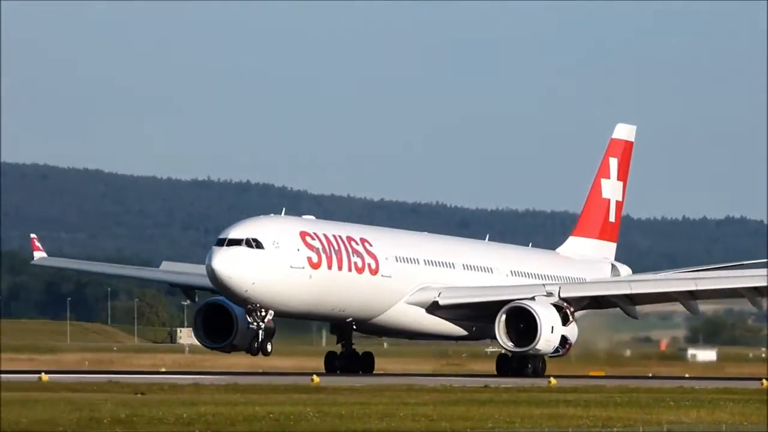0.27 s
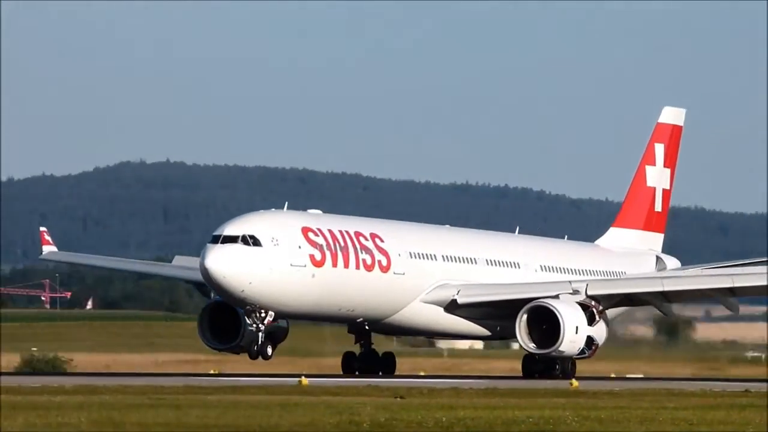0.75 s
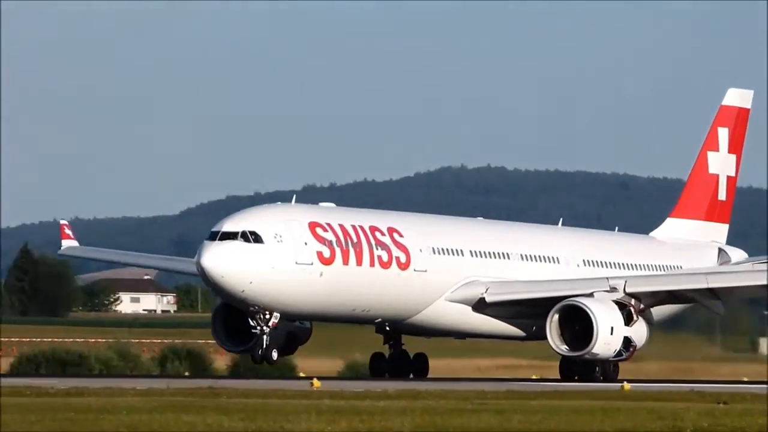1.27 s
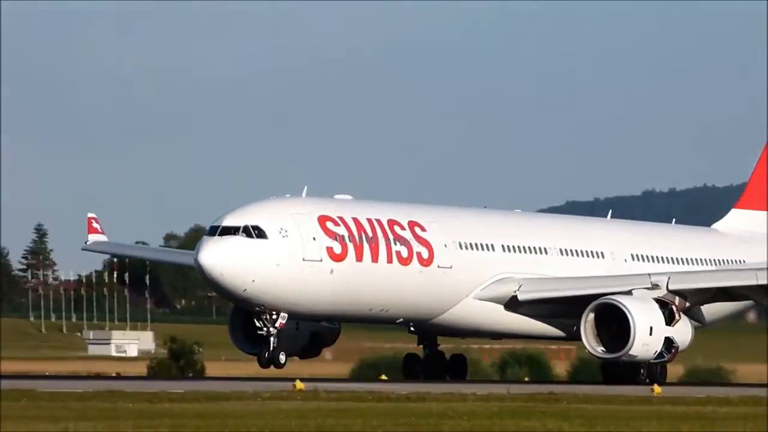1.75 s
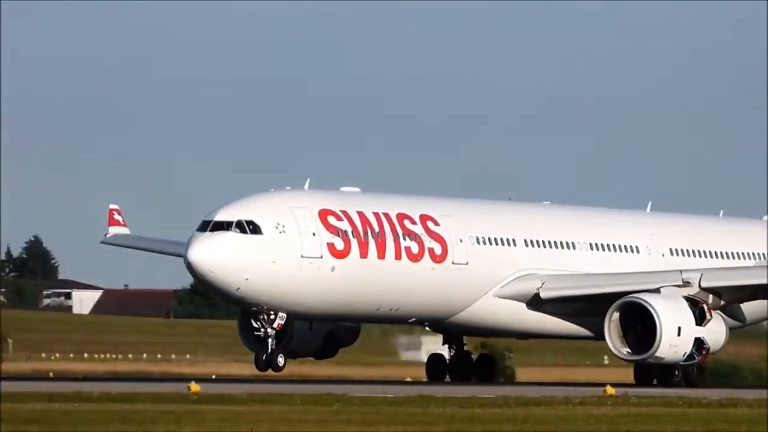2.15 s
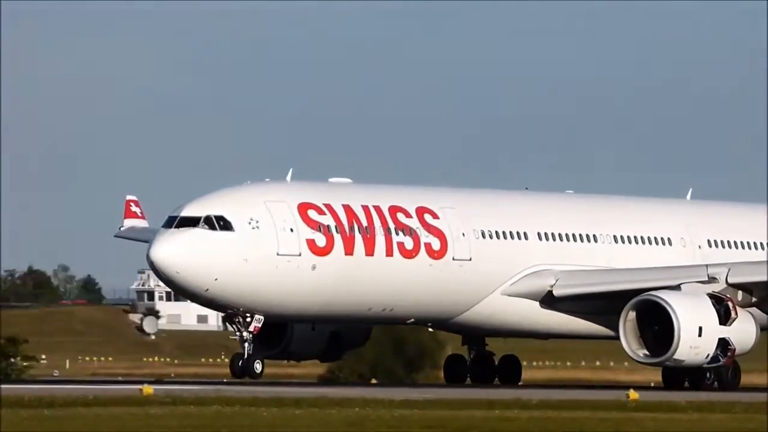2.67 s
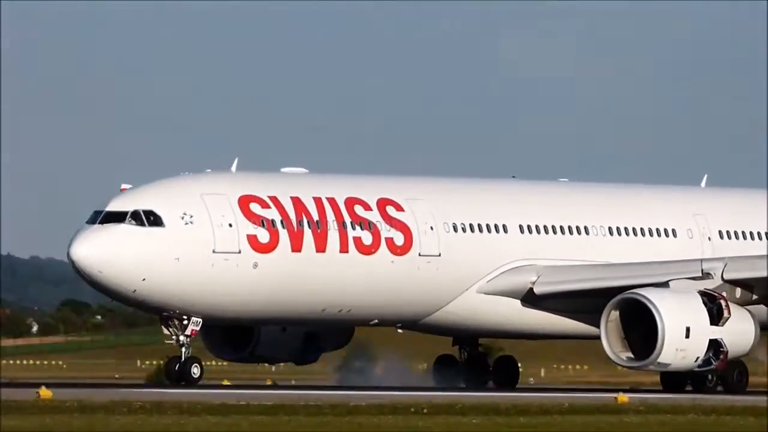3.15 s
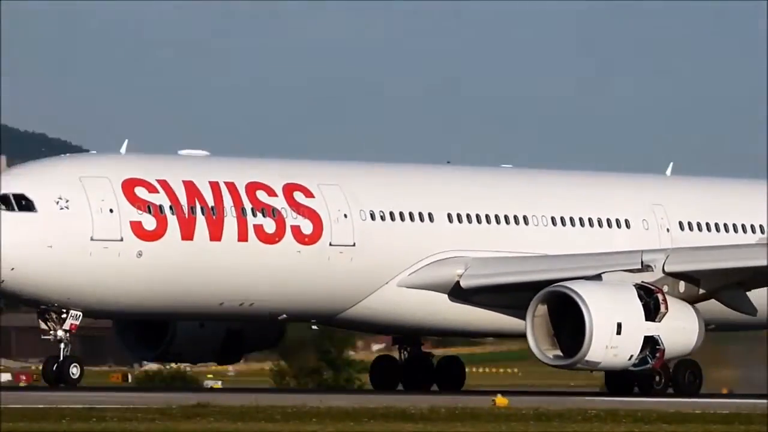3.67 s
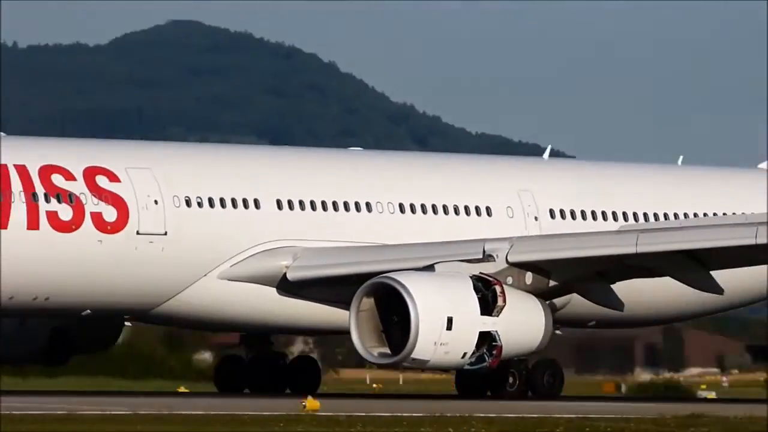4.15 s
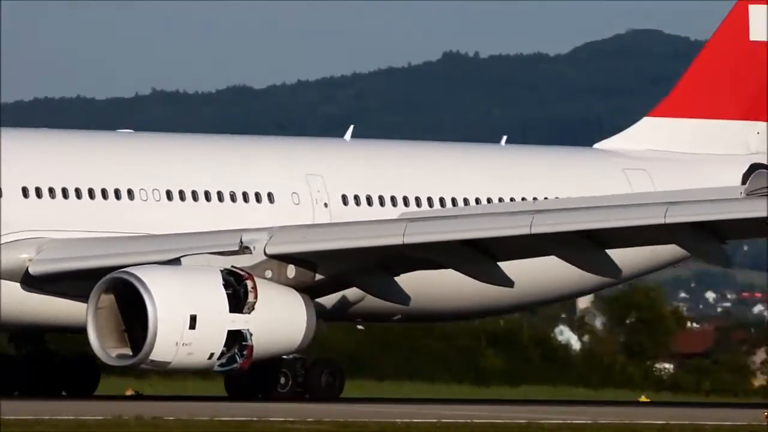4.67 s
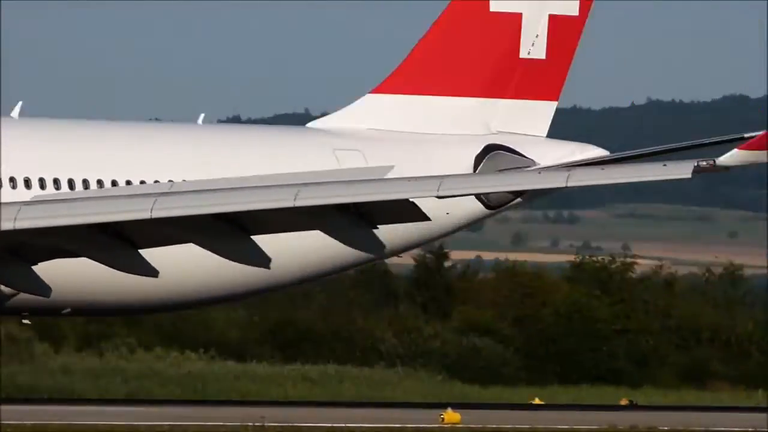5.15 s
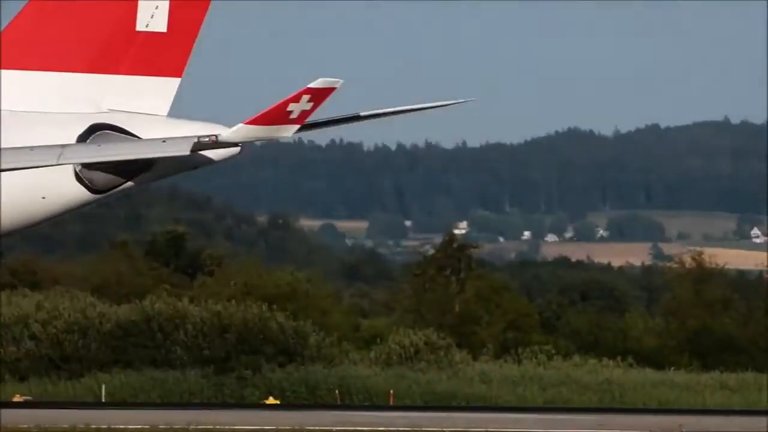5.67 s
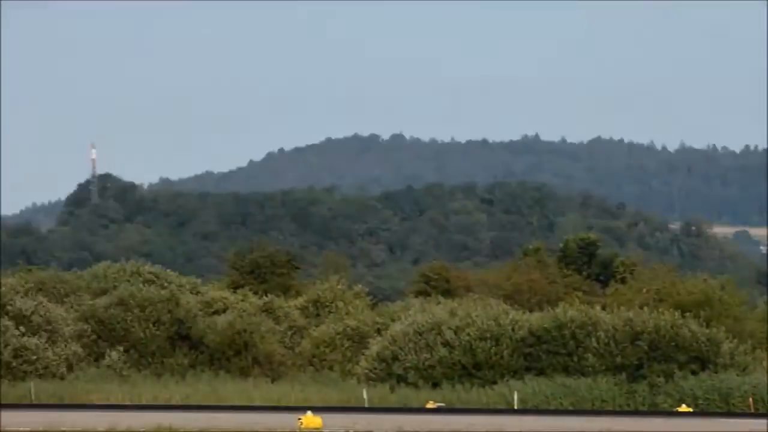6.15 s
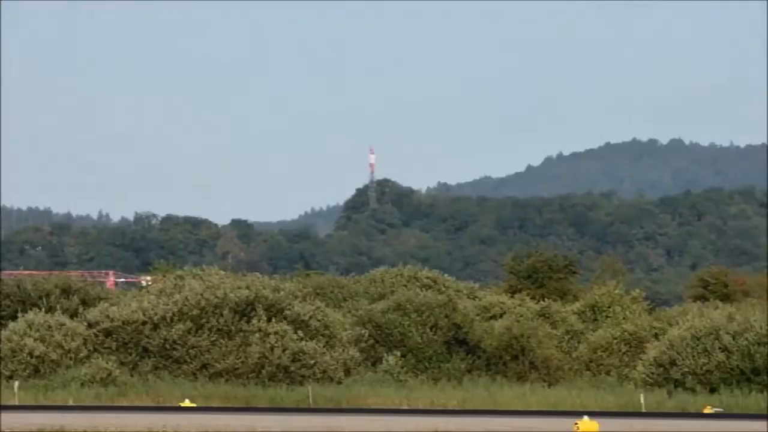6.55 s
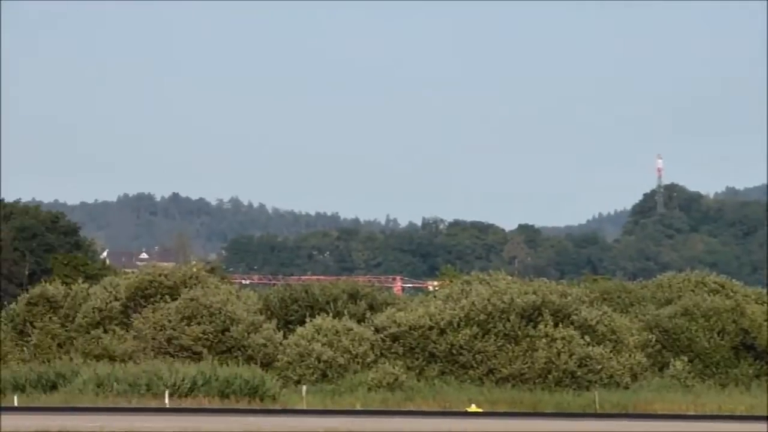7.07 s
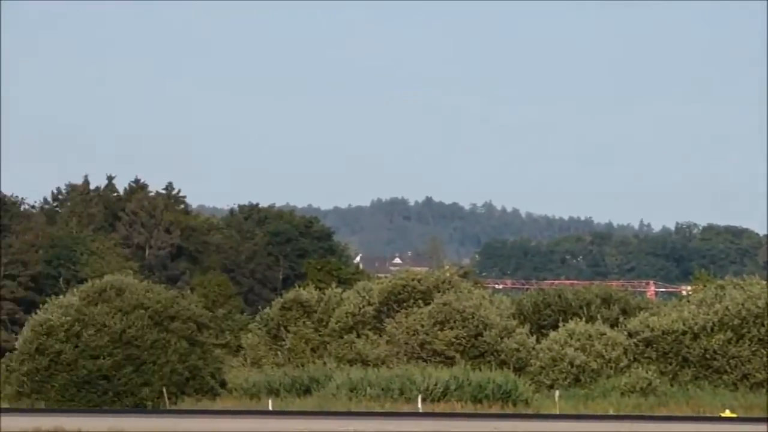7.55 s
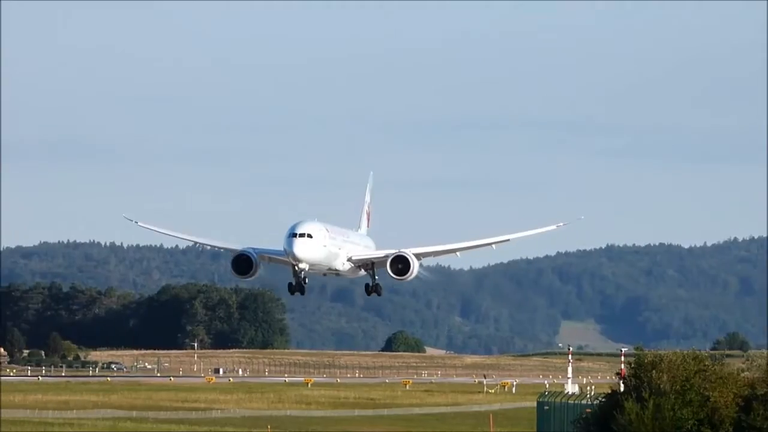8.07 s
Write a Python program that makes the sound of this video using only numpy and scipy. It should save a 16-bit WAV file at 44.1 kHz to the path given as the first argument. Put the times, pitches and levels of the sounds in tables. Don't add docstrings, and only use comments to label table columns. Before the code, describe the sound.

Loud, gusty jet roar with fleeting fan buzz and high whine brightens as the plane passes, then cuts to a softer, muffled far-off jet.

```python
import sys
import numpy as np
from scipy import signal
from scipy.fft import rfft, irfft
from scipy.io import wavfile
from scipy.ndimage import uniform_filter1d, map_coordinates

SR = 44100
rng = np.random.default_rng(int(sys.argv[2]) if len(sys.argv) > 2 else 0)


def linear_from_db(decibels):
    return 10 ** (np.asarray(decibels, float) / 20)


def generate_wav(sig):
    pcm = np.round(np.clip(np.atleast_2d(sig).T, -1, 1) * 32767).astype(np.int16)
    wavfile.write(sys.argv[1], SR, pcm)


N = 366735
SIZE, HOP = 1024, 256
HZ = np.arange(SIZE // 2 + 1)[:, None] * SR / SIZE + 1e-3
FRAME_S = np.arange(N // HOP + 2) * HOP / SR
PASSES_S = 6.4

CHANGE_S = (7.7075, 7.7745)


def colour(table, hz):
    f, db = np.transpose(table)
    return np.interp(np.log(hz), np.log(f), db)


def hump(x, centre, width, db):
    return db * np.exp(-.5 * ((x - centre) / width) ** 2)


def curves(table, s):
    t, *columns = np.transpose(table)
    return [np.interp(s, t, c) for c in columns]


def passed(s):
    passing_s = 0.93
    return .5 + .5 * np.tanh((s - PASSES_S) / passing_s)


def walk(rate, octaves):
    grid = rng.standard_normal((60, 1200))
    pitch_place = np.clip(np.log2(HZ / 20), 0, 11) / octaves
    place = np.broadcast_arrays(pitch_place, FRAME_S * rate)
    return 1.34 * map_coordinates(grid, place, order=1)


def turbulence(broad_db, patchy_db, quick_db):
    broad = broad_db * walk(rate=9, octaves=2.9)
    patchy = patchy_db * walk(rate=4.003, octaves=0.3011)
    return broad + patchy + quick_db * walk(rate=22, octaves=1.142)


def roar(db, lo_hz, hi_hz, level_db, side_db=0):
    # frequency in Hz, side minus mid in dB.
    scatter = [(25, -6), (60, -18), (110, -14.5), (190, -17), (340, -32), (610, -21.5), (1090, -19),
               (1950, -18.5), (3480, -16), (6210, -12.5), (11100, -12)]
    band = (HZ[:, 0] > lo_hz) & (HZ[:, 0] < hi_hz)
    power = np.sum(linear_from_db(db[band]) ** 2, axis=0) * 2 / SIZE
    gain = linear_from_db(db + level_db) / np.sqrt(power)
    gains = np.array([gain, gain * linear_from_db(colour(scatter, HZ) + side_db)])
    frames = signal.stft(rng.standard_normal((2, N)), nperseg=SIZE, noverlap=SIZE - HOP)[2]
    shaped = frames * gains[..., :frames.shape[-1]]
    mid, side = signal.istft(shaped, nperseg=SIZE, noverlap=SIZE - HOP)[1][:, :N]
    return np.array([mid + side, mid - side])


def gusts(drift_db):
    # time in seconds, lift in dB, spread in seconds.
    eddies = [(.24, 4, .03), (1.0, 2, .04), (1.15, 2.5, .04), (1.34, 4, .035), (2.16, 5, .07),
              (2.35, 3, .05), (2.87, 2, .05), (3.07, 2, .03), (3.36, 3, .04), (3.67, 3.5, .04),
              (4.12, 2, .04), (4.3, 3, .035), (4.59, 5.5, .06), (4.85, 2.2, .04), (5.1, 3, .05),
              (5.26, 3, .03), (5.38, 4, .03), (5.55, 2, .05), (5.69, 5.5, .03), (5.8, 8, .035),
              (5.99, 6, .022), (6.08, 3, .02), (6.21, 4.5, .05), (6.6, 2.5, .04), (6.8, 2, .05),
              (7.03, 4, .08), (7.39, 6, .05), (7.56, 5, .03)]
    lift_db = sum(hump(FRAME_S, at, spread, db) for at, db, spread in eddies)
    return lift_db - uniform_filter1d(lift_db, size=70) + drift_db


def reversers():
    # time in seconds, roar level in dB, nearness from 0 to 1.
    roll = [(0.0, -19, 0), (.25, -18.5, 0.09), (.5, -17.5, 0.17), (.73, -19, 0.29), (1.2, -17, 0.2),
            (1.65, -16.5, 0.22), (2.0, -17.5, 0.26), (2.8, -17.5, 0.37), (3.42, -20, 0.41),
            (3.7, -17.5, 0.34), (4.35, -19.5, 0.56), (4.55, -19, 0.58), (5.1, -18.5, 0.72), (5.9, -20, 0.9),
            (6.65, -21, 0.87), (6.97, -19.5, 0.91), (7.3, -21, 0.88), (7.7, -19, 0.71)]
    # frequency in Hz, density in dB per Hz.
    far_colour = [(18, -81), (30, -50), (43, -52.5), (80, -21), (131, -24), (283, -15.5), (383, -5.5),
                  (584, -9), (672, -7.5), (932, -4.5), (1260, -2.5), (2260, -5.5), (2790, -19.5),
                  (4260, -23.5), (8000, -58), (10400, -91), (17600, -120)]
    near_colour = [(18, -75.5), (30, -38.5), (297, -12), (381, -14.5), (453, -2), (626, -7.5), (764, -4),
                   (887, -0.5), (1110, -3), (1650, -4), (1970, -6), (3950, -9.5), (5890, -11),
                   (8560, -20.5), (11500, -39), (15000, -80.5), (22000, -120)]
    # centre in Hz, width in Hz, lift in dB.
    cascade = (4040, 190, 5.1)
    haze = (7900, 1000, -9)
    # centre in Hz, lift ahead in dB, lift passed in dB,
    # fraction sunk on passing, fraction by which it starts low.
    humps = [(614, 2.5, 9, 0.05, 0.2), (915, 3, 2.5, 0, 0.2), (1304, 5, 3, .09, 0.03),
             (1833, 4.5, 8, .11, .13)]
    hump_widths = (50, 82.5, 99, 80)
    # centre in Hz, width in Hz, lift in dB.
    duct = [(1250, 84, 2.5), (666, 46, -5), (950, 150, 0.5)]

    level_db, near = curves(roll, FRAME_S)
    gone = passed(FRAME_S)
    cold = np.exp(-FRAME_S / .9)
    drift = walk(rate=2.5, octaves=.5)
    gust_db = gusts(drift_db=.3 * drift[-1, ::-1])

    db = colour(far_colour, HZ) + near * (colour(near_colour, HZ) - colour(far_colour, HZ))
    db = db + gust_db * np.minimum(HZ / 5500, 1.6) ** 0.41 / (1 + (2300 / HZ) ** 3)
    db = db + np.maximum(near, 0) ** 2 * hump(HZ, *cascade)
    db = db + np.maximum(1 - 2 * near, 0) * hump(HZ, *haze)
    rumble_db = 5 * gone + walk(rate=3, octaves=1.38)
    thud_db = -6.5 * gone - 4 * cold
    db = db + rumble_db / (1 + (HZ / 350) ** 4) + thud_db / (1 + (HZ / 110) ** 4)

    swell_db = level_db - uniform_filter1d(level_db, size=300)
    for (hz, ahead_db, passed_db, sink, start), width_hz in zip(humps, hump_widths):
        own = drift[int(hz * SIZE / SR)]
        centre_hz = hz * (1 - sink * gone - start * cold + .015 * own[::-1])
        lift_db = ahead_db + (passed_db - ahead_db) * gone + swell_db + 1.32 * own
        db = db + hump(HZ, centre_hz, width_hz, lift_db)
    overshoot = hump(FRAME_S, 1.8, 0.39, 0.94)
    db = db + overshoot * sum(hump(HZ, *mode) for mode in duct)

    level_db = level_db + .08 * gust_db
    flutter_db = turbulence(broad_db=0.5, patchy_db=0.5, quick_db=0.56)
    return roar(db, 450, 3200, level_db + flutter_db, side_db=-1)


def blade_tone(hz, moments, wobble_hz, flutter_db):
    s = np.arange(N) / SR
    gain = sum(hump(s, at, spread, linear_from_db(db)) for at, db, spread in moments)
    held = np.repeat(rng.standard_normal((2, N // 900 + 1)), 900, axis=1)
    tremble = uniform_filter1d(held, size=900, axis=1)[:, :N]
    phase = 2 * np.pi * np.cumsum(hz + wobble_hz * tremble[1]) / SR
    return np.sqrt(2) * gain * linear_from_db(flutter_db * tremble[0]) * np.sin(phase)


def fan_ahead():
    # time in seconds, level in dB, spread in seconds.
    buzz = [
        (.0, -23, .07),
        (.34, -27, .07),
        (.48, -31, .07),
        (.68, -32, .06),
        (.98, -32, .1),
    ]
    s = np.arange(N) / SR
    return blade_tone(607 - 36 * np.exp(-s / .45), buzz, wobble_hz=8, flutter_db=2)


def compressor():
    # time in seconds, rate in Hz.
    spool = [(.8, 4980), (1.0, 5176), (1.22, 5350), (1.5, 5478), (1.75, 5510), (2.0, 5471), (2.4, 5350),
             (3.2, 5160), (4.1, 4900)]
    # (time in seconds, level in dB, spread in seconds).
    stages = [
        (.854, .18, [(1.5, -52, .2), (2.17, -45, .09), (2.45, -50, .15), (2.8, -57, .15)]),
        (1, 0, [(1.1, -48, .1), (1.33, -49, .05), (1.65, -51, .22), (2.2, -50, .15), (2.7, -57, .25), (3.5, -56, .15), (3.85, -59, .15)]),
        (1.15, 0, [(1.33, -60, .07), (1.7, -59, .17), (2.1, -65, .15), (3.4, -61, .15)]),
    ]
    s = np.arange(N) / SR
    tones = 0
    for multiple, lead_s, moments in stages:
        rate_hz = multiple * curves(spool, s + lead_s)[0]
        tones = tones + blade_tone(rate_hz, moments, wobble_hz=24, flutter_db=5)
    return linear_from_db(-.3) * tones


def fan_passing():
    # time in seconds, level in dB, spread in seconds.
    buzz = [
        (6.53, -32, .07),
        (6.75, -36, .06),
        (6.97, -34, .07),
        (7.29, -32, .07),
        (7.52, -34, .09),
    ]
    s = np.arange(N) / SR
    return blade_tone(652 - 35 * (s - PASSES_S), buzz, wobble_hz=16, flutter_db=4)


def approach():
    # frequency in Hz, density in dB per Hz.
    distant_colour = [(24, -82), (40, -65), (116, -43), (150, -16.5), (256, -21.5), (331, -17.5), (366, -8),
                      (396, -14), (428, -8.5), (702, -14), (1020, -6), (1130, -5), (1370, -19), (2170, -19),
                      (4500, -58), (5850, -90), (9900, -120)]
    # centre in Hz, width in Hz, lift in dB.
    distant_humps = [(520, 88, 0.5), (1247, 62, 8), (2100, 130, 4)]
    # centre in Hz, width in Hz, lift in dB per second.
    opening = (2950, 350, 20)
    db = colour(distant_colour, HZ) + sum(hump(HZ, *h) for h in distant_humps)
    db = db - 30 * np.clip(np.log2(HZ / 4000), 0, 2)
    db = db + hump(HZ, *opening) * (FRAME_S - 8.15)
    flutter_db = turbulence(broad_db=.5, patchy_db=.6, quick_db=.8)
    return roar(db, 330, 1900, -27.5 + flutter_db, side_db=-1.5)


def scene():
    s = np.arange(N) / SR
    pan_db = -.15 + 2.65 * passed(s)
    jet = reversers() + fan_ahead() + compressor() + fan_passing()
    jet = jet * linear_from_db(np.array([pan_db, -pan_db]) / 2)
    return np.where(s < np.mean(CHANGE_S), jet, approach())


def casing(x):
    # centre in Hz, width in Hz, lift in dB.
    resonances = [(98.5, 17, 4.5), (271.6, 21.5, 4), (381.6, 20, -10), (4250, 150, -1.5), (4415, 81, -5.5)]
    hz = np.arange(N // 2 + 1) * SR / N
    port_db = -.45
    x = x * linear_from_db(np.array([[port_db], [-port_db]]) / 2)
    return irfft(rfft(x) * linear_from_db(sum(hump(hz, *r) for r in resonances)), N)


def circuit_hiss():
    # frequency in Hz, density in dB per Hz.
    hiss_colour = [(3000, 0), (4500, 0), (8000, -6), (11000, -12), (14000, -18), (15200, -23), (16000, -45)]
    level_db = -66 - 5.5 * (FRAME_S < CHANGE_S[1])
    return roar(colour(hiss_colour, HZ) + 0 * FRAME_S, 4400, 15500, level_db, side_db=7)


def ragged_treble(x):
    frames = signal.stft(x, nperseg=SIZE, noverlap=SIZE - HOP)[2]
    power = np.mean(np.abs(frames) ** 2, axis=0)
    blocks = uniform_filter1d(uniform_filter1d(power, size=8, axis=0), size=4, axis=1)
    masker = blocks[(HZ[:, 0] > 5000) & (HZ[:, 0] < 7000)].mean(axis=0)
    masker = uniform_filter1d(masker, size=8)
    growth = (masker / np.median(masker)) ** .55
    mask_db = -32.5 - 8 * np.clip((HZ - 11200) / 1000, 0, 3)
    mask_db = mask_db + 4 * rng.standard_normal(power.shape)
    heard = (blocks > masker * growth * linear_from_db(2 * mask_db)) | (HZ < 7000)
    rows = np.arange(power.shape[0]) // 8 * 8 + 4
    columns = np.arange(power.shape[1]) // 4 * 4
    heard = heard[np.minimum(rows, SIZE // 2)][:, columns]
    return signal.istft(frames * heard, nperseg=SIZE, noverlap=SIZE - HOP)[1][:, :N]


def line_whistle():
    s = np.arange(N) / SR
    level_db = -94 - 3.5 * s * (s < CHANGE_S[1])
    return linear_from_db(level_db) * np.sin(2 * np.pi * 15625 * s)


def change_gate():
    s = np.arange(N) / SR
    silent = (s >= CHANGE_S[0]) & (s <= CHANGE_S[1])
    gate = np.where(silent, linear_from_db(-26 - 1800 * (s - CHANGE_S[0])), 1)
    ends = np.clip(np.minimum(N / SR - s, .001 + s) / .002, 0, 1)
    return uniform_filter1d(gate, size=14) * ends


def top_cut(x):
    return signal.sosfilt(signal.butter(12, 15690, fs=SR, output="sos"), x)


def record(dry):
    heard = ragged_treble(casing(dry) + circuit_hiss())
    wet = heard - .0055 + line_whistle()
    return top_cut(wet * change_gate())


dry = scene()
out = record(dry)
generate_wav(out)
```